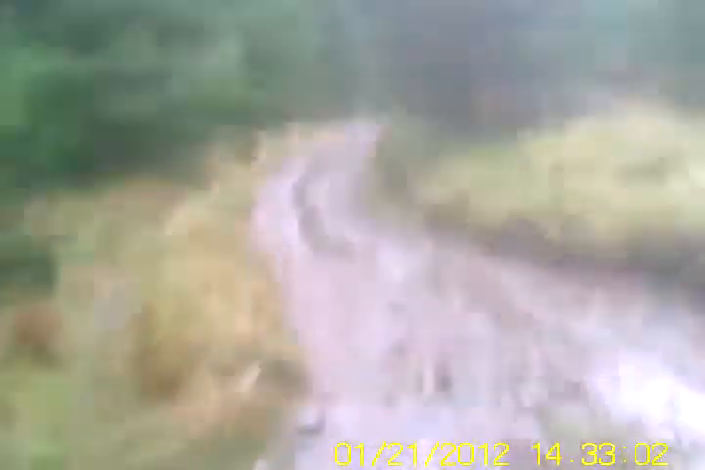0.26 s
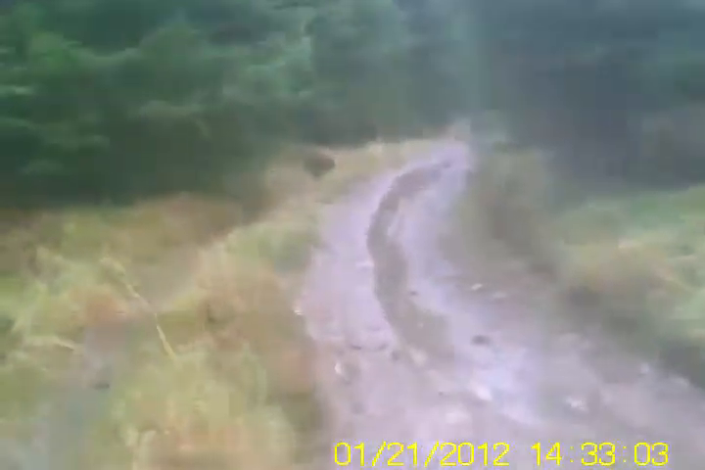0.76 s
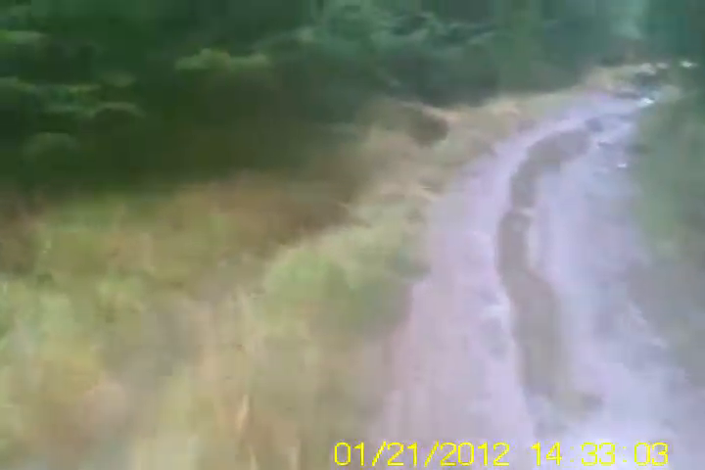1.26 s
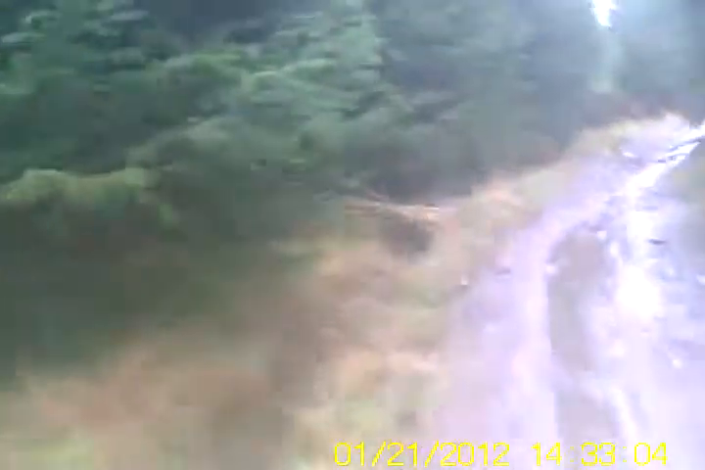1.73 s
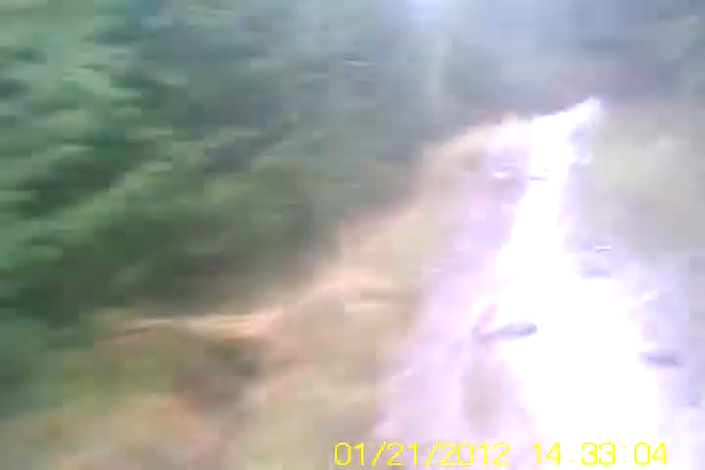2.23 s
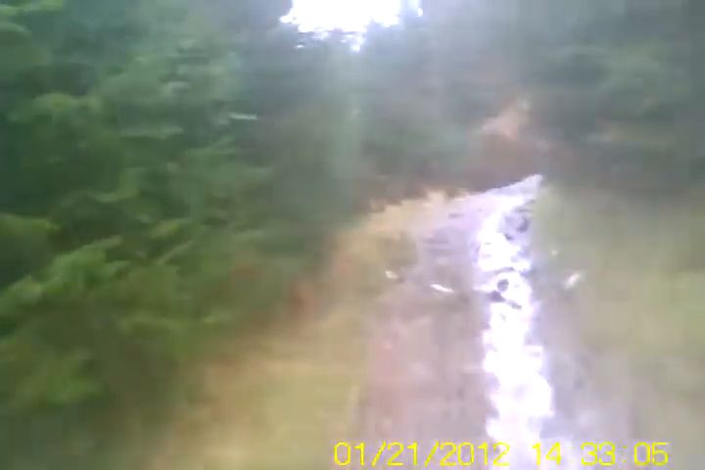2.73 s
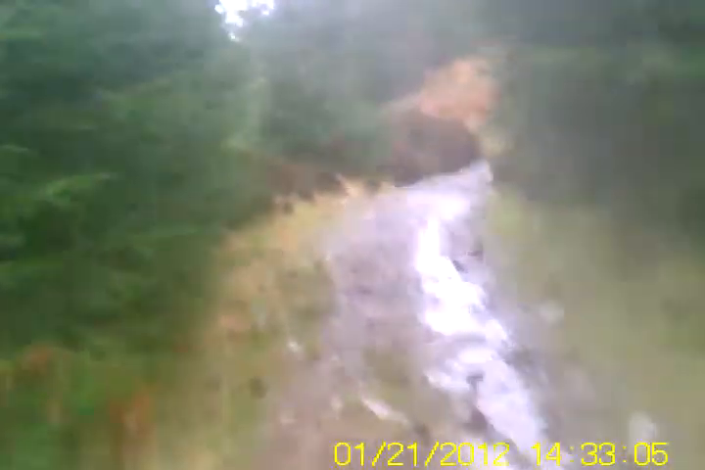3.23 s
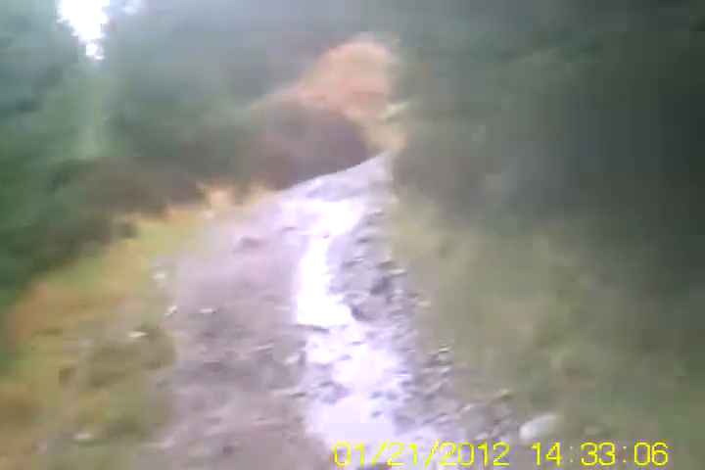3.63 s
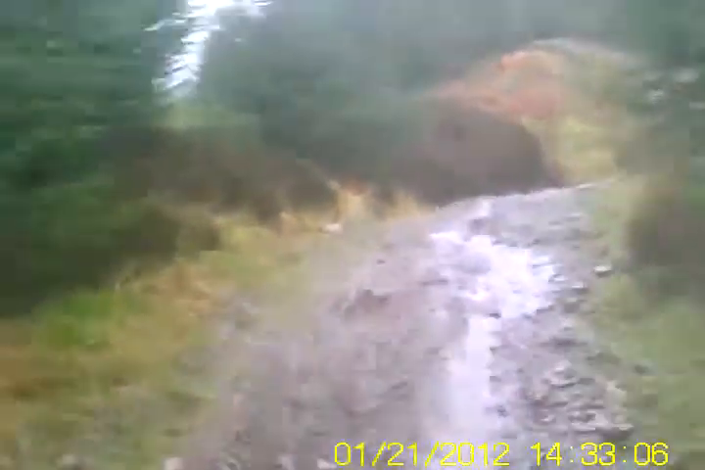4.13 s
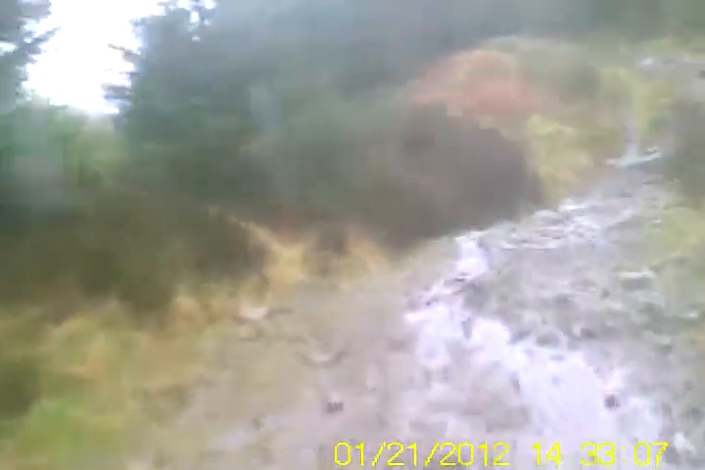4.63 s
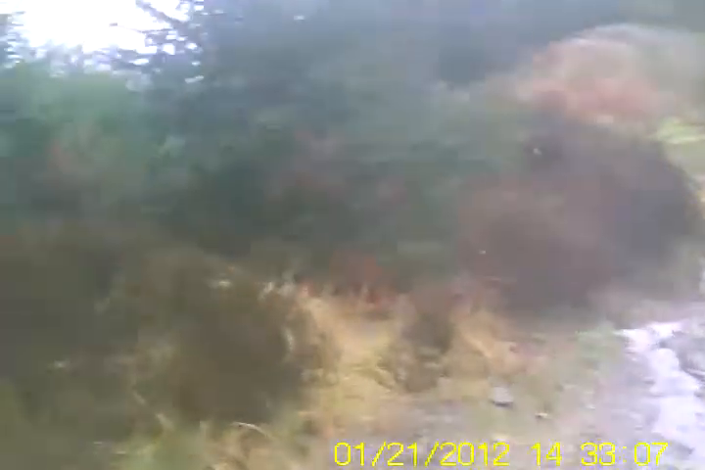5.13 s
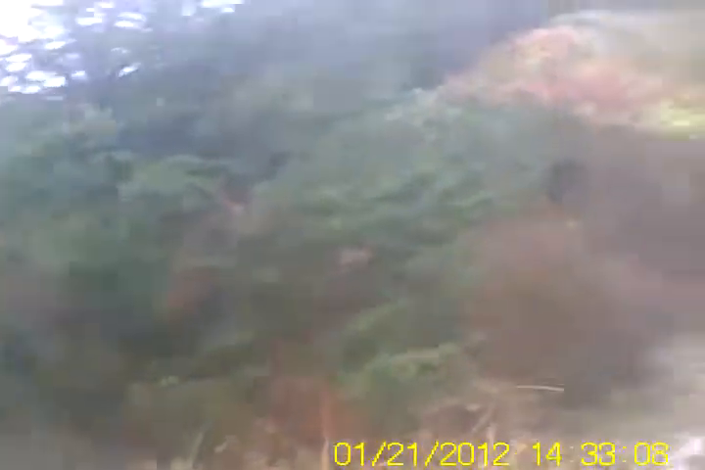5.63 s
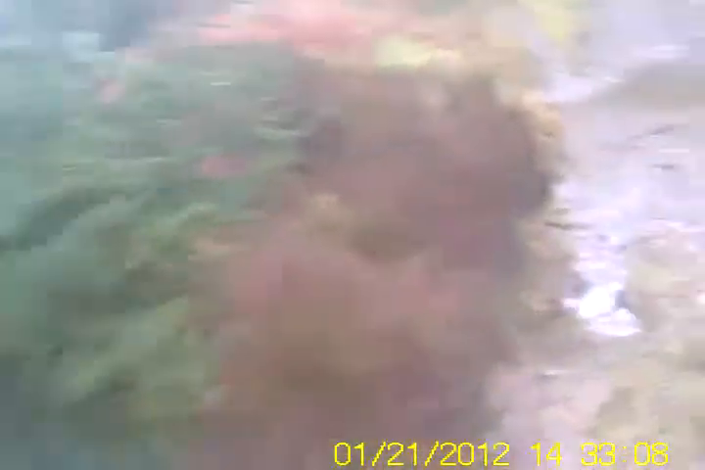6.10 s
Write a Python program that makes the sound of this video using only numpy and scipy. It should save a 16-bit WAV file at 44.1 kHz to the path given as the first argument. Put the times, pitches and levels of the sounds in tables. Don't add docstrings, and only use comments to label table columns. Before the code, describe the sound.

A downhill bike ride on gravel: low buffeting, clicking loose parts and puddle hiss, ending in a loud, distorted brake squeal of about one second.

```python
import sys
import numpy as np
from scipy import signal
from scipy.io import wavfile
from scipy.ndimage import uniform_filter1d

SR = 44100
rng = np.random.default_rng(int(sys.argv[2]) if len(sys.argv) > 2 else 0)


def pcm_store(signal):
    levels = np.round(np.clip(np.atleast_2d(signal), -1, 1) * 32767)
    wavfile.write(sys.argv[1], SR, levels.astype(np.int16).T)


def to_linear_factor(level_db):
    exponent = np.asarray(level_db, float) / 20
    return 10 ** exponent


N = 280476


def read(points, hz):
    f, value = np.transpose(points)
    return np.interp(np.log(hz + 1), np.log(f + 1), value)


def evened(x):
    return x / np.sqrt(np.mean(x ** 2) + 1e-20)


def curve(rows, column):
    return np.interp(np.arange(N) / SR, [r[0] for r in rows], [r[column] for r in rows])


def add(mix, s, sound):
    start = max(round(s * SR) - len(sound) // 2, 0)
    part = mix[start:][:len(sound)]
    part += sound[:len(part)]


def bell(length):
    t = np.arange(-round(2 * length * SR), round(2 * length * SR)) / SR
    return t, np.exp(-4 * np.log(2) * (t / length) ** 2)


def wander(span):
    once = uniform_filter1d(rng.standard_normal(N), int(span))
    return evened(uniform_filter1d(once, int(span)))


def noise(shape_db, size, patchy_db, flicker_db):
    frames, hz = 4 * N // size + 5, np.fft.rfftfreq(size, 1 / SR)
    a, b, patches = rng.standard_normal((frames, len(hz), 3)).T
    patches = evened(uniform_filter1d(uniform_filter1d(patches, 5, 0), 5, 1))
    flicker = evened(uniform_filter1d(rng.exponential(1, frames) - 1, 3))
    level_db = shape_db(hz)[:, None] + patchy_db * patches + flicker_db * flicker
    z = (a + 1j * b) * to_linear_factor(level_db)
    return evened(signal.istft(z, nperseg=size, noverlap=size * 3 // 4)[1][:N])


# (start_s, end_s, level_db)
BUZZ = (5.565, 6.09, -17)
# (start_s, level_db, pitch_hz, t60_s)
RING_OUT = (6.105, -29, 1835, .5)
# (start_s, pitch_hz, level_db)
SQUEAL = [
    (4.62, 930.4, -32),
    (4.99, 926, -23),
    (5.04, 945.6, -14),
    (5.1, 914, -6),
    (5.53, 920, -8),
    (5.62, 934, -7),
    (5.72, 923.5, -7),
    (6.09, 922, -8.5),
    (6.13, 954, -26),
]
# (centre_s, depth_db, length_s)
SLIPS = [(5.046, -21, 0.005), (5.082, -23, 0.0042), (5.136, -8, 0.014), (5.158, -8, 0.0039),
         (5.176, -24, 0.004), (5.195, -21, 0.0094), (5.239, -10.5, 0.016), (5.294, 6.5, 0.043),
         (5.311, -16, 0.021), (5.358, -11, .0034), (5.381, -12.5, 0.067), (5.442, -12, 0.0056),
         (5.516, -5.5, 0.035), (5.554, 11.5, 0.0055), (5.589, -3.5, 0.018), (5.616, -5, 0.012),
         (5.645, -8, 0.015), (5.7, -2.5, 0.014), (5.768, -10.5, 0.018), (5.805, -17, 0.011),
         (5.828, -5, 0.0092), (5.848, -4.5, .006), (5.88, -3.5, 0.013), (5.898, -2, 0.031),
         (5.918, -6.5, 0.012), (6.023, -3, .01), (6.047, -9.5, 0.01), (6.064, -5.5, 0.019),
         (6.105, -2, .012), (6.111, 1, 0.0053)]


def brake():
    t, slip_db = np.arange(N) / SR, np.zeros(N)
    for s, depth_db, length in SLIPS:
        add(slip_db, s, depth_db * bell(length)[1])
    steady = t >= BUZZ[0]

    weak = np.clip((-18 - curve(SQUEAL, 2)) / 10, 0, 1) * np.where(t < BUZZ[1], 1, .8)
    free = (t - SQUEAL[-1][0]).clip(0)
    level_db = curve(SQUEAL, 2) - 92 * free + slip_db
    level_db += (0.9 + 4.7 * weak) * wander(196) + 0.45 * wander(65)
    grip = to_linear_factor(level_db) * np.clip((t - SQUEAL[0][0]) / 0.065, 0, 1)

    droop_hz = 14 * np.exp(-((t - RING_OUT[0]) / .014) ** 2)
    pitch_hz = curve(SQUEAL, 1) + 328 * free.clip(0, .12) - droop_hz
    waver_turns = np.where(steady, .055, .062) + 0.19 * weak
    turns = np.cumsum(pitch_hz) / SR + waver_turns * wander(503)
    contact_turns = turns + .125

    third = 0.095 * np.where(steady, 1, .4) * (1 - weak) * np.cos(6 * np.pi * contact_turns - 1.3)
    out = grip * (0.71 * np.cos(2 * np.pi * turns) + third)
    pulled = locked_level()
    out += upper_flares() + pulled * np.cos(4 * np.pi * turns + .7 + .5 * wander(600))
    out += .18 * signal.lfilter(*signal.butter(4, 2300, "high", fs=SR), out ** 2)
    stray = .08 * pulled * wander(110) * np.cos(2 * np.pi * 1720 * t)
    return out + ring_out() + stray + camera_buzz(grip, contact_turns)


# (centre_s, level_db, length_s, pitch_hz)
CHIRPS = [(5.043, -39, 0.0016, 1806), (5.057, -17, 0.02, 1873), (5.073, -20, 0.0065, 1853),
          (5.086, -21, 0.0063, 1845), (5.096, -24, 0.0079, 1813), (5.115, -20, 0.0048, 1835),
          (5.122, -35, 0.0016, 1768), (5.123, -19, 0.0026, 1816), (5.134, -7.5, 0.017, 1785),
          (5.153, -7.5, 0.0087, 1842), (5.176, -7.5, 0.011, 1778), (5.186, -9.5, 0.0081, 1720),
          (5.196, -14, 0.0055, 1805), (5.203, -16, 0.0046, 1755), (5.206, -26, 0.0018, 1773),
          (5.219, -20, 0.005, 1742), (5.224, -24, 0.0024, 1790), (5.23, -18, 0.0032, 1812),
          (5.243, -17, 0.007, 1793), (5.256, -20, 0.0059, 1850), (5.268, -19, 0.0075, 1834),
          (5.277, -16, 0.0026, 1801), (5.294, -15, 0.0055, 1847), (5.317, -11.5, 0.015, 1818),
          (5.336, -10.5, 0.0043, 1795), (5.345, -12, 0.0057, 1802), (5.351, -16, 0.004, 1780),
          (5.36, -27, 0.0019, 1827), (5.375, -15.5, 0.027, 1820), (5.41, -18.5, 0.0171, 1822),
          (5.429, -21, 0.0099, 1785), (5.444, -30, 0.003, 1838), (5.451, -25, 0.0018, 1887),
          (5.468, -14, 0.025, 1803), (5.49, -15, 0.0083, 1773), (5.507, -6.5, 0.011, 1823),
          (5.522, -5.5, 0.0096, 1820), (5.548, -10, 0.013, 1855), (5.563, -11.5, 0.0058, 1827)]
# (centre_s, level_db, length_s, pitch_hz)
FLARE = (5.771, -7, .02, 1817)


def upper_flares():
    power, flares = np.zeros(N), CHIRPS + [FLARE]
    for s, db, length, hz in flares:
        add(power, s, to_linear_factor(2 * db + 6.5) * bell(length)[1] ** 2)
    return np.sqrt(power) * np.cos(2 * np.pi * np.cumsum(curve(flares, 3)) / SR)


# (centre_s, level_db, length_s)
LOCKED = [(5.63, -18.5, 0.0086), (5.682, -19, 0.009), (5.731, -19, .012), (5.79, -15, 0.012),
          (5.813, -18.5, 0.017), (5.845, -18.5, 0.0066), (5.866, -18.5, 0.014), (5.904, -19, 0.019),
          (5.947, -14.5, 0.03), (6.01, -13.5, 0.04), (6.091, -13.5, 0.019)]


def locked_level():
    pulled = np.zeros(N)
    for s, db, length in LOCKED:
        add(pulled, s, to_linear_factor(db + 2.5) * bell(length)[1])
    return pulled


def ring_out():
    t = np.arange(N) / SR
    s, db, hz, t60 = RING_OUT
    level_db = db + 4.5 - 60 * (t - s).clip(0) / t60 + 3.4 * wander(210)
    return (t > s) * to_linear_factor(level_db) * np.sin(2 * np.pi * hz * t + 0.6 * wander(300))


# (centre_s, level_db, length_s)
SHAKES = [(5.101, -7, 0.0084), (5.116, -21, 0.014), (5.13, -9.5, 0.0085), (5.146, -19.5, 0.0052),
          (5.168, -12.5, 0.0012), (5.246, -28, 0.0024), (5.377, -33, 0.011), (5.286, -10.5, 0.0119),
          (5.322, -20, 0.0076), (5.331, -13, 0.0049), (5.403, -25.5, 0.012), (5.454, -15, 0.0076),
          (5.474, -41, 0.014), (5.476, -17.5, 0.019), (5.494, -30, 0.0053), (5.535, -22.5, 0.0054),
          (5.089, -22, 0.004), (5.217, -20.5, 0.0014), (5.56, -7, 0.017)]


def camera_buzz(grip, contact_turns):
    t = np.arange(N) / SR
    start, end, buzz_db = BUZZ
    steady = np.interp(t, [start, start + .01, end, end + .012, end + .035], [0, 1, 1, .2, 0])
    shake = to_linear_factor(buzz_db) * steady * np.tanh(grip / to_linear_factor(-8)) ** 1.45 * 1.62
    for s, db, length in SHAKES:
        add(shake, s, to_linear_factor(db) * bell(length)[1])

    loose_turns = np.where(t < start, .07, .008)
    phase = contact_turns + loose_turns * wander(33)
    beats = np.flatnonzero(np.diff(np.floor(phase)) > 0)
    late = (phase[beats + 1] % 1) / (phase[beats + 1] - phase[beats])
    size = shake[beats] * to_linear_factor(10 + .45 * rng.standard_normal(N)[beats].clip(-2, 1.5))
    blows = np.bincount(beats, size * late, N) + np.bincount(beats + 1, size * (1 - late), N)

    contact = signal.lfilter(*signal.butter(1, 300, "high", fs=SR), strike())
    shell = signal.lfilter(*signal.butter(2, 4400, "high", fs=SR), contact)
    ticks = signal.oaconvolve(blows, contact)[:N]
    rocking = signal.oaconvolve(.45 * wander(350) * blows, shell)[:N]
    hiss = .22 * shake * noise(fizz_db, size=256, patchy_db=3, flicker_db=1)
    return ticks + rocking + hiss


def fizz_db(hz):
    low = 11 / (1 + ((hz - 9000) / 800) ** 2)
    middle = 11 / (1 + ((hz - 11050) / 350) ** 2)
    high = 13 / (1 + ((hz - 12900) / 350) ** 2)
    return read(SPRAY, hz) + low + middle + high


# (start_s,
# level_db)
TICKS = [(0.0066, -14.0), (0.0111, -13.0), (0.0175, -11.0), (0.0235, -15.0), (0.0552, -16.0),
         (0.0947, -7.0), (0.0987, -19.0), (0.1026, -6.0), (0.1086, -5.0), (0.1131, -8.0),
         (0.1272, -11.0), (0.1732, -20.0), (0.2607, -18.0), (0.2943, -7.0), (0.2989, -6.0),
         (0.308, -14.0), (0.3106, -8.0), (0.3122, -3.0), (0.3149, -5.0), (0.3168, -5.0),
         (0.3179, -11.0), (0.3209, -8.0), (0.4895, -24), (0.5115, -25), (0.5417, -14.0),
         (0.5458, -13.0), (0.6407, -13.0), (0.6418, -22.0), (0.6453, -12.0), (0.6467, -19.0),
         (0.6498, -23.0), (0.6641, -22.0), (0.6663, -19.0), (0.6709, -20.0), (0.673, -17.0),
         (0.6752, -19.0), (0.6778, -17.0), (0.7342, -13.0), (0.7383, -15.0), (0.7399, -11.0),
         (0.9432, -22.0), (0.9892, -10.0), (0.9903, -21.0), (0.9998, -7.0), (1.0262, -21.0),
         (1.1625, -15.0), (1.1644, -19.0), (1.1662, -16.0), (1.1701, -18.0), (1.3437, -20.0),
         (1.4117, -23.0), (1.4234, -21.0),
         (1.7471, -20.0), (1.7506, -18.0), (2.1201, -23.0), (2.1215, -22.0), (2.2695, -8.0),
             (2.3024, -22.0), (2.3329, -21.0), (2.3605, -15.0), (2.3622, -16.0), (2.365, -14.0),
             (2.3666, -18.0), (2.4599, -20.0), (2.5759, -16.0), (2.6317, -20.0), (2.8949, -20.0),
             (2.9032, -18.0), (2.9563, -16.0), (2.9853, -17.0), (2.9868, -12.0), (2.9894, -7.0),
             (2.9931, -8.0), (2.9947, -1.0), (2.996, 3), (2.9984, -2.0), (3.0007, 0.0), (3.0053, 4.5),
             (3.0442, -11.0), (3.0456, -9.0), (3.0585, -9.0), (3.0836, -13.0), (3.0849, -14.0),
             (3.1495, -14.0), (3.3009, -17.0), (3.3019, -17.0), (3.3193, -15.0), (3.3764, -12.0),
             (3.394, -12.0), (3.3983, -14.0), (3.4, -13.0), (3.4568, -3.0), (3.4584, -13.0), (3.4612, -6.0),
             (3.4666, -1.0), (3.4705, -9.0), (3.4725, -2.0), (3.4771, -4.0), (3.497, -12.0), (3.499, -5.0),
             (3.5016, -12.0),
         (3.5387, -8.0), (3.5415, -9.0), (3.5458, -8.0), (3.5499, -11.0), (3.5804, -15.0),
               (3.585, -6.0), (3.5907, -15.0), (3.593, -14.0), (3.5947, -12.0), (3.6337, -18.0),
               (3.6375, -13.0), (3.6386, -10.0), (3.831, -18.0), (3.8632, -15.0), (3.9081, -11.0),
               (3.9102, -11.0), (3.9119, -7.0), (3.9138, -18.0), (3.9815, -17.0), (3.9829, -3.0),
               (3.9987, -3.0), (4.0008, -6.0), (4.0026, -6.0), (4.033, -18.0), (4.0514, -12.0),
               (4.0541, -13.0), (4.0577, -7.0), (4.0616, -13.0), (4.0639, -13.0), (4.0657, -6.0),
               (4.0674, -4.0), (4.1098, -9.0), (4.1127, -15.0), (4.1407, -13.0), (4.1438, -15.0),
               (4.1871, -17.0), (4.1882, -16.0), (4.1961, -11.0), (4.1976, -15.0), (4.2003, -8.0),
               (4.2044, -8.0), (4.2064, -18.0),
         (4.2388, -5.0), (4.2399, -8.0), (4.2875, -10.0), (4.289, -7.0), (4.2945, -7.0),
              (4.3324, -17.0), (4.3863, -5.0), (4.3883, -10.0), (4.4469, -9.0), (4.4555, -7.0),
              (4.4616, -6.0), (4.4982, -7.0), (4.5002, -6.0), (4.5022, -7.0), (4.5046, -4.0),
              (4.5069, -11.0), (4.5089, -4.0), (4.5127, -11.0), (4.5584, -2.0), (4.56, -15.0), (4.5641, -6),
              (4.568, -12.0), (4.5703, -9.0), (4.5748, -2.0), (4.5938, -8.0), (4.596, -14.0),
              (4.5973, -12.0), (4.6546, -1), (4.6559, -11), (4.6631, -12.0), (4.6762, -15.0),
              (4.6781, -6.0), (4.6813, -5.0), (4.6868, -15.0), (4.7338, -8.0), (4.7434, -10.0),
              (4.7817, -17.0), (4.8417, -14.0), (4.919, -15.0), (4.9515, -10.0), (4.9631, -12.0),
              (6.303, -28), (6.337, -29)]


def strikes():
    s, db = np.transpose(TICKS)
    return np.bincount(np.round(s * SR).astype(int) - 4, to_linear_factor(db + 1), N)


# (pitch_hz, level_db, t60_s)
SHELL = [(3740, 1, 0.0014), (5070, -20.5, 0.013), (7570, -14, 0.006), (9050, -12.5, 0.007)]


def strike():
    t = np.arange(600) / SR
    push = np.exp(-np.log(np.maximum(t, 1e-6) / 9e-5) ** 2 / 0.5)
    modes = sum(to_linear_factor(db - 60 * t / t60) * np.sin(2 * np.pi * hz * t) for hz, db, t60 in SHELL)
    tick = push + np.minimum(t / 1e-4, 1) * modes
    return signal.lfilter(*signal.butter(2, [180, 10500], "band", fs=SR), tick)


def rattle():
    tiny = (rng.random(N) < 320 / SR) * to_linear_factor(5 * np.minimum(rng.exponential(1, N), 2.5))
    blows = strikes() + tiny * to_linear_factor(curve(RIDE, 2) - 0.6)
    square = (1 - 0.25 * rng.random(N)) * np.clip(blows / to_linear_factor(-9), .35, 1)
    glancing = to_linear_factor(1) * signal.lfilter(*signal.butter(3, 4800, fs=SR), strike())
    bright = signal.oaconvolve(blows * square, strike())
    dull = signal.oaconvolve(blows * (1 - square), glancing)
    return (bright + dull)[:N]


# (centre_s, level_db, length_s)
HUMS = [(0.005, -27, 0.013), (0.115, -23.5, 0.024), (0.236, -26.5, 0.019), (0.313, -27, 0.012),
        (1.005, -25, 0.01), (1.163, -26.5, 0.0052), (3.005, -17.5, 0.031), (3.395, -32, 0.0097),
        (3.472, -19.5, 0.015), (3.588, -27, 0.0057), (4.063, -24.5, 0.0049), (4.234, -15.5, 0.0034),
        (4.279, -25.5, 0.0098), (4.503, -27.5, 0.031), (4.572, -17.5, 0.019), (4.665, -16, 0.0076),
        (4.734, -23, 0.0049), (4.839, -26.5, 0.0067), (5.237, -20, 0.0087), (5.565, -18, 0.0025),
        (5.802, -29, 0.009), (6.048, -31.5, 0.0061), (6.188, -31.5, 0.0045)]
# (centre_s, level_db, length_s)
LOADED = [
    (0.535, -29, 0.035),
    (0.668, -28, 0.018),
    (0.735, -27, 0.0085),
    (3.494, -22.5, 0.0084),
    (3.537, -23, 0.011),
    (3.999, -24.5, 0.018),
    (4.386, -18, 0.0076),
]
# (centre_s, level_db, length_s, pitch_hz)
KNOCKS = [
    (1.119, -23, 0.0068, 156),
    (2.47, -34, 0.016, 145),
    (2.741, -15, 0.0031, 1570),
    (3.698, -39, 0.15, 950),
    (4.24, -10.5, 0.0076, 172),
    (4.877, -16.5, 0.006, 1710),
    (5.557, -27, 0.023, 141),
]


def rings():
    out = np.zeros(N)
    hums = [(s, db, length, 440 - 3.5 * (db + 22)) for s, db, length in HUMS + LOADED]
    events = hums + KNOCKS
    for (s, db, length, hz), sway in zip(events, rng.standard_normal((len(events), 2))):
        t, swell = bell(length)
        wobble = .35 * np.tanh(sway[0]) * np.cos(3.5 * t / length + sway[1])
        way = -1.5 if (s, db, length) in LOADED else length < .04
        glide = 1 - 500 * .0045 * t * way
        add(out, s, to_linear_factor(db + 2.5) * swell * np.sin(2 * np.pi * hz * t * glide + wobble))
    return out


def thuds():
    out, bumps = np.zeros(N), HUMS + LOADED
    for (s, db, length), grit in zip(bumps, rng.standard_normal((len(bumps), 9000))):
        t, swell = bell(length)
        body = signal.lfilter(*signal.butter(2, [280, 1000], "band", fs=SR), grit)
        add(out, s, to_linear_factor(db - 7.5) * swell * evened(body)[300:300 + len(t)])
    return out


# (pitch_hz, width_hz, level_db)
CASE = [(1747, 590, 12), (5820, 1020, 13), (8120, 1000, 10.5)]


def cased(points):
    def shape_db(hz):
        peaks = sum(db / (1 + (2 * (hz - f) / w) ** 2) for f, w, db in CASE)
        return read(points, hz) + peaks
    return shape_db


# (start_s, airflow_db, tyre_load_db)
RIDE = [(0.0, -25.5, -44.5), (0.6, -29, -49), (1.1, -28.5, -45.5), (1.3, -28, -47), (1.6, -24, -45),
        (1.95, -26.5, -46), (2.3, -21.5, -45), (3.1, -23.5, -42.5), (3.5, -18, -40.5), (4.0, -20.5, -41),
        (4.2, -17, -41), (4.95, -19, -38.5), (5.05, -24.5, -40), (5.4, -31, -39.5), (5.6, -47, -57),
        (6.1, -42, -47), (6.17, -41, -58), (6.36, -35, -61)]
# (frequency_hz, level_db per Hz)
GRIND = [(76, -44), (130, -5.5), (859, 0.5), (1750, -8), (3370, -4), (4770, -20.5), (8350, -28),
         (13000, -43)]
# (frequency_hz, level_db per Hz)
SPRAY = [(2500, -55), (4500, -8.5), (6000, -10), (7200, -16), (8300, -9.5), (10500, -19.5), (13000, -31.5),
         (14000, -47)]
# (centre_s, level_db, length_s, pitch_hz)
STONES = [(0.126, -19, 0.0028, 1650), (0.213, -23.5, 0.0054, 1550), (0.219, -35, 0.0037, 1750),
          (0.258, -23, 0.0038, 1789), (0.264, -24, 0.0062, 1730), (0.314, -20, 0.0056, 1392),
          (0.322, -23, 0.0042, 1990), (0.386, -27, 0.0025, 2118), (0.518, -28, 0.0056, 1844),
          (0.55, -26.5, 0.0044, 1443), (0.7, -28, 0.0035, 1100), (1.066, -27, 0.0042, 2013),
          (1.116, -27.5, 0.007, 1000), (1.342, -33, 0.0025, 1741), (1.375, -35, 0.0056, 2000),
          (1.393, -22.5, 0.0029, 1861), (1.662, -24, 0.0033, 1370), (1.685, -28.5, 0.0038, 2080),
          (1.703, -39, 0.0058, 1983), (2.099, -23, 0.003, 1850), (2.41, -25, 0.0028, 1560),
          (2.578, -26.5, 0.0044, 1979), (2.788, -22, 0.0027, 1930), (2.947, -20.5, 0.0057, 1820),
          (2.994, -20, 0.0027, 1780), (3.057, -18, 0.0073, 2014), (3.245, -29, 0.0045, 1477),
          (3.323, -19.5, 0.0064, 1440), (3.428, -20, 0.0064, 1900), (3.466, -21, 0.0064, 1320),
          (3.537, -21, 0.0045, 1456), (3.949, -20.5, 0.0068, 1600), (4.0, -20, 0.0031, 2545),
          (4.162, -18, 0.0052, 1560), (4.243, -18, 0.0043, 1790), (4.248, -13, 0.004, 1610),
          (4.293, -17, 0.0042, 1970), (4.361, -23, 0.002, 1940), (4.463, -12, 0.0039, 1660),
          (4.47, -18, 0.0047, 1960), (4.487, -15, 0.012, 1580), (4.519, -18, 0.0035, 1843),
          (4.615, -24, 0.0068, 1409), (4.877, -17, 0.0042, 1540)]
# (centre_s, level_db, length_s)
SPLASHES = [(1.285, -36, 0.007), (3.611, -33, .004), (2.94, -23, 0.0017), (2.994, -13.5, 0.0098),
            (4.191, -28, 0.0071), (4.463, -28, 0.036), (0.505, -44, 0.024), (1.165, -38.5, 0.023),
            (4.277, -27.5, 0.013), (4.338, -29.5, .013), (4.565, -12.5, 0.0045), (4.843, -29, 0.024),
            (4.92, -24, 0.002), (4.952, -19.5, 0.009)]


def tyres():
    grind = noise(cased(GRIND), size=256, patchy_db=2.7, flicker_db=2.9)
    spray = noise(cased(SPRAY), size=256, patchy_db=3.4, flicker_db=2.6)
    out = to_linear_factor(curve(RIDE, 2) + 10.5) * grind + to_linear_factor(-1.5) * puddles() * spray
    hits = STONES + [(*row, 5350) for row in SPLASHES]
    for (s, db, length, hz), grit in zip(hits, rng.standard_normal((len(hits), 7000))):
        t, swell = bell(length)
        band = signal.butter(3, [0.53 * hz, 1.54 * hz], "band", fs=SR)
        ring = evened(signal.lfilter(*band, grit))
        sudden = np.where(t < 0, swell ** 3, swell ** .7)
        add(out, s, to_linear_factor(db - 1.0) * sudden * ring[300:300 + len(t)])
    return out


# (start_s, length_s, spray_db)
PUDDLES = [
    (0.78, 0.06, -49),
    (1.29, 0.46, -51),
    (2.576, 0.16, -41.5),
    (2.76, 0.33, -38),
    (3.1, 0.47, -41),
    (3.806, 0.21, -41.5),
    (4.13, 0.59, -43.5),
    (4.907, 0.075, -40.5),
    (5.385, .27, -50),
    (6.044, 0.065, -30.5),
]


def puddles():
    t = np.arange(N) / SR
    level = np.full(N, to_linear_factor(-65))
    for s, length, db in PUDDLES:
        rise = np.clip((t - s) / 0.012, 0, 1)
        drain = np.exp(-(t - s - length).clip(0) / 0.0074)
        level += to_linear_factor(db) * rise * drain
    return level


# (frequency_hz, level_db per Hz)
WIND = [(8, -4), (21, -8.5), (45, -20), (78, -15), (125, -28), (300, -30.5), (520, -44), (880, -120)]
# (centre_s, pressure_peak, half_length_s)
JOLTS = [(0.056, 0.55, 0.0085), (0.124, 0.25, 0.016), (0.26, 0.53, 0.0046), (1.034, 0.42, 0.01),
         (1.126, 0.55, 0.013), (3.037, -0.3, 0.0029), (3.058, 0.86, 0.013), (3.087, -0.025, 0.019),
         (3.35, 0.39, 0.0043), (3.515, 0.99, 0.016), (3.839, 0.4, 0.006), (4.008, 0.49, 0.019),
         (4.245, 0.63, 0.0055), (4.269, -0.58, 0.016), (4.404, 0.015, 0.022), (4.485, 0.59, 0.016),
         (4.611, 0.96, 0.029), (4.737, -0.31, 0.011), (5.273, -0.86, 0.014), (5.552, -0.52, 0.0039),
         (6.324, 0.29, 0.024)]


def wind():
    buffeting = noise(lambda hz: read(WIND, hz), size=2048, patchy_db=1.5, flicker_db=2.0)
    out = to_linear_factor(curve(RIDE, 1) - 2) * buffeting
    for s, peak, half in JOLTS:
        t, swell = bell(1.19 * half)
        add(out, s, 0.75 * peak * swell * np.cos(np.pi * t / (5.7 * half)))
    return signal.lfilter(*signal.butter(1, 14, "high", fs=SR), out)


def scene():
    return (brake() + rattle() + rings() + thuds() + tyres() + wind())[None]


def low_pass(x):
    return signal.sosfilt(signal.butter(12, 15800, fs=SR, output="sos"), x)


def record(dry):
    biased = dry - 0.023
    wrapped = biased - 2.6 * np.clip((biased - 1.4) / .05, 0, 1)
    limited = signal.oaconvolve(wrapped, signal.firwin(91, 13200, fs=SR)[None], "same")
    mix = np.clip(limited, -1, 1)
    return low_pass(mix)


dry = scene()
out = record(dry)
pcm_store(out)
```